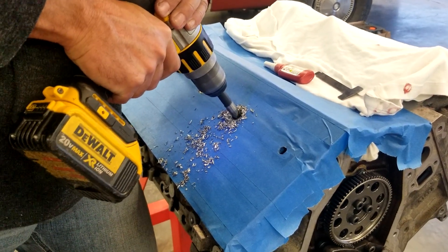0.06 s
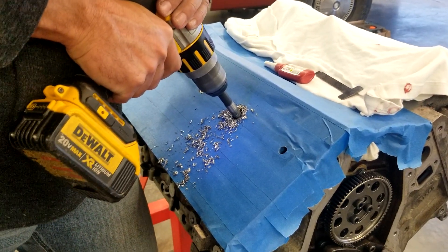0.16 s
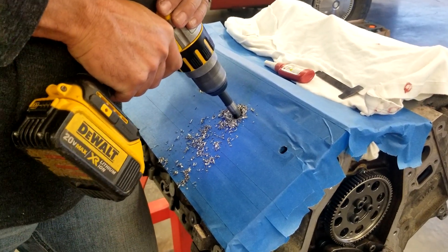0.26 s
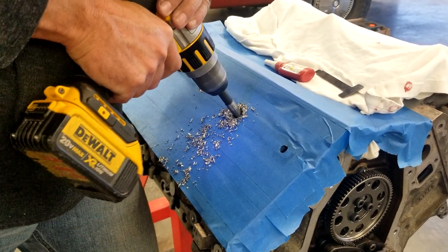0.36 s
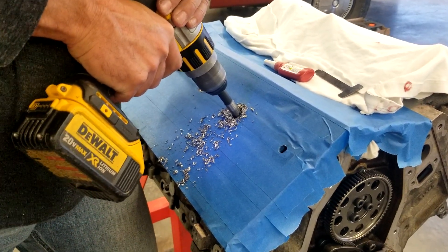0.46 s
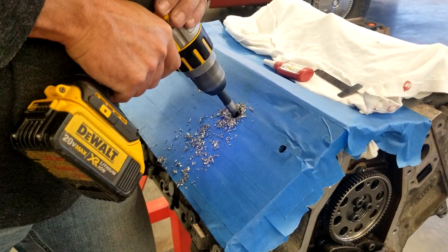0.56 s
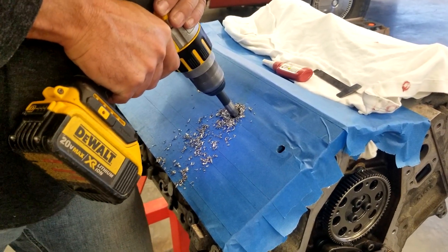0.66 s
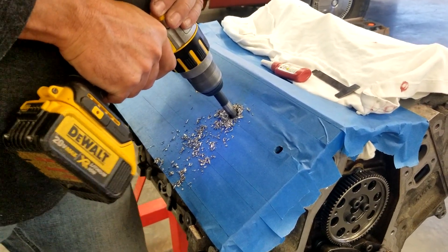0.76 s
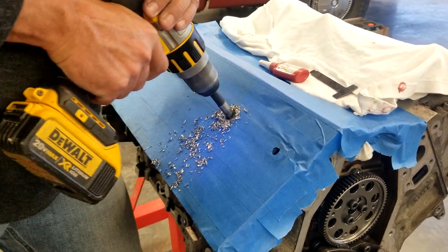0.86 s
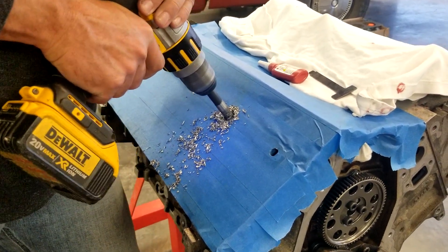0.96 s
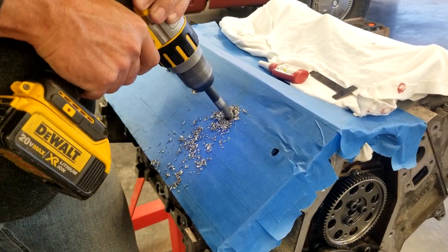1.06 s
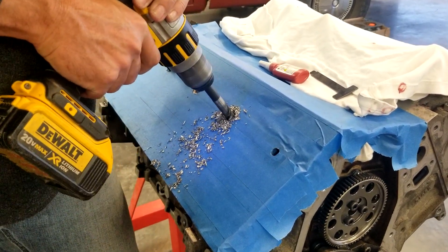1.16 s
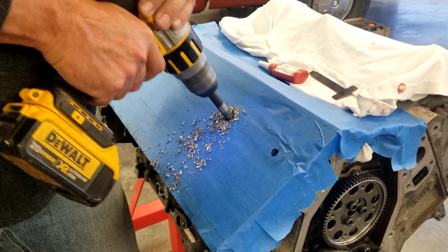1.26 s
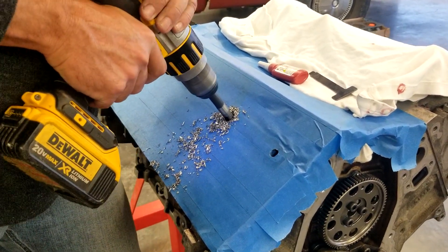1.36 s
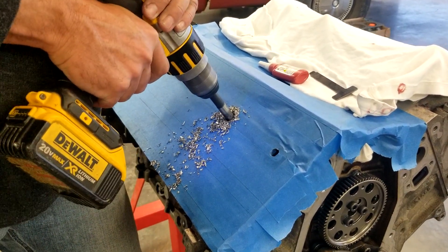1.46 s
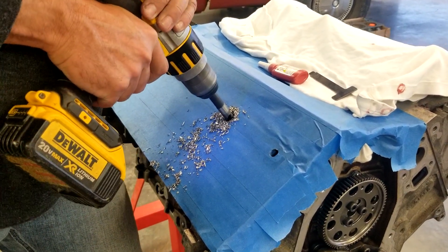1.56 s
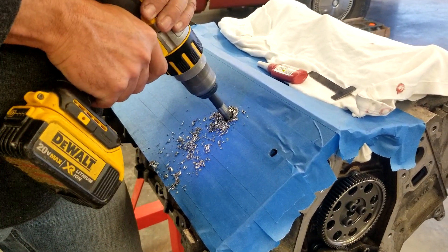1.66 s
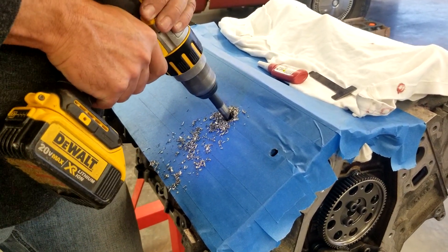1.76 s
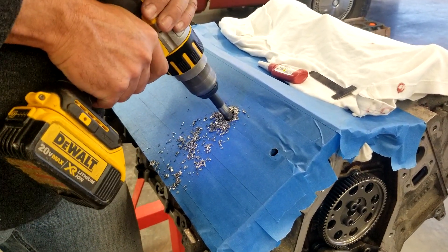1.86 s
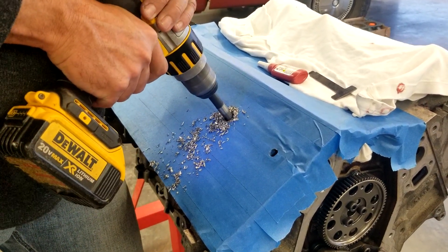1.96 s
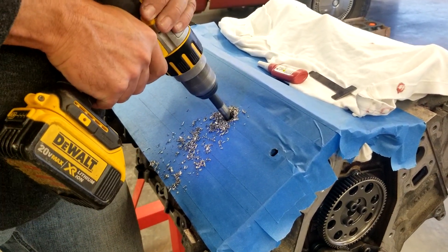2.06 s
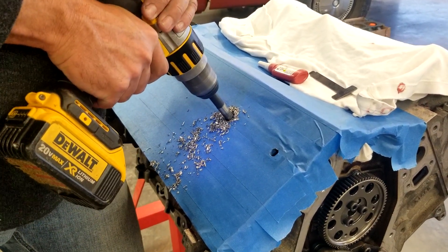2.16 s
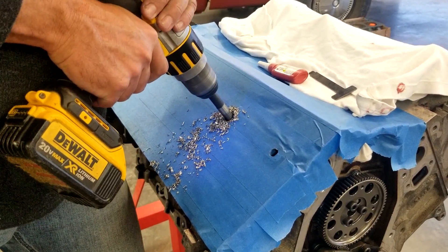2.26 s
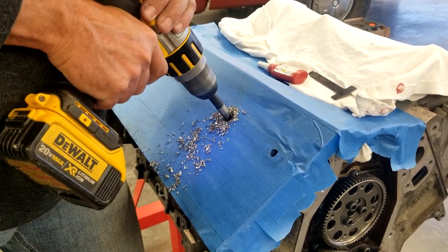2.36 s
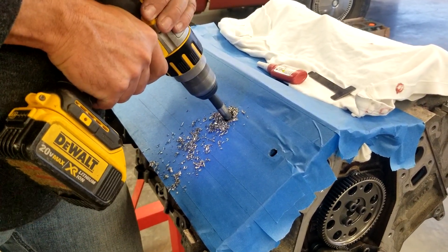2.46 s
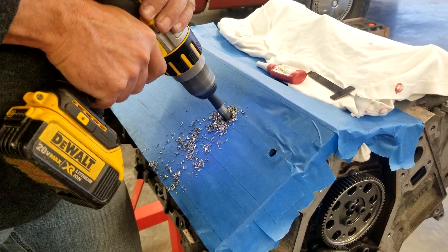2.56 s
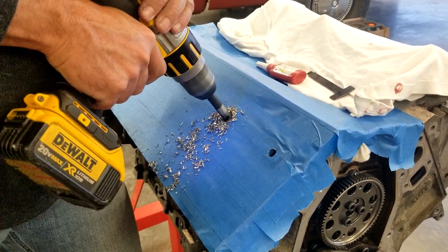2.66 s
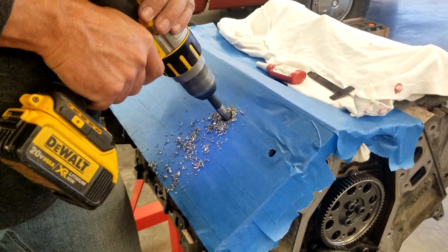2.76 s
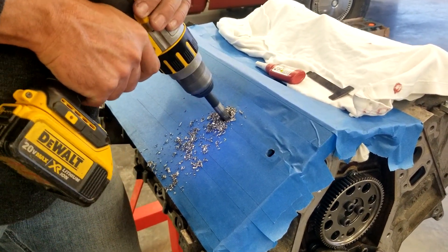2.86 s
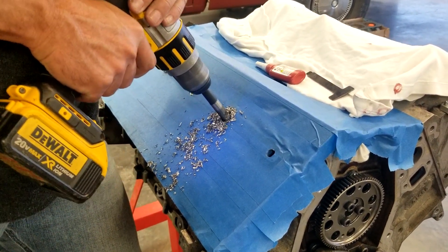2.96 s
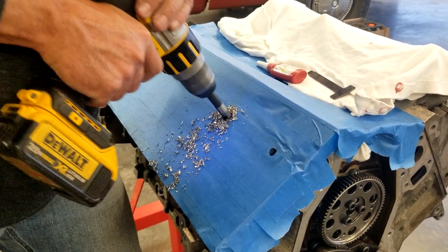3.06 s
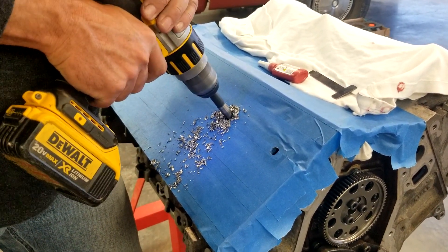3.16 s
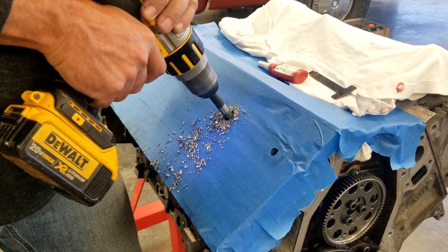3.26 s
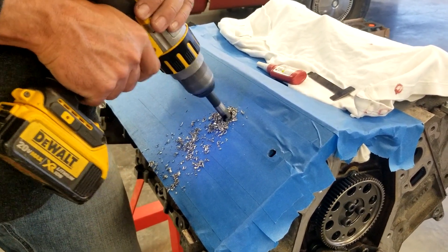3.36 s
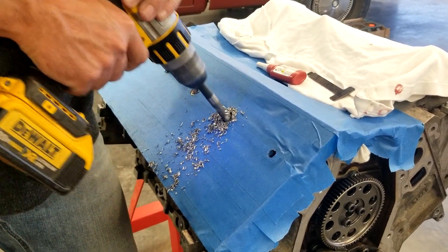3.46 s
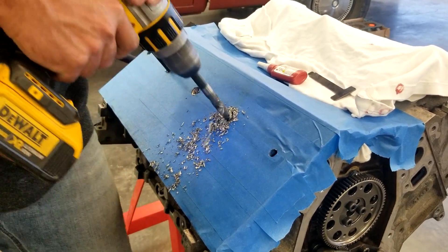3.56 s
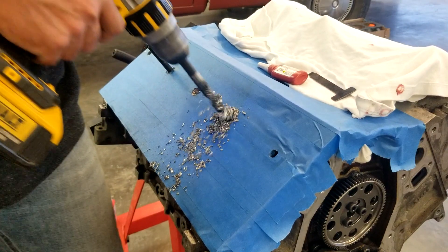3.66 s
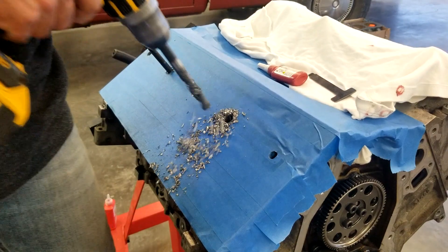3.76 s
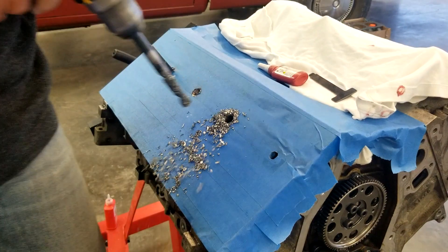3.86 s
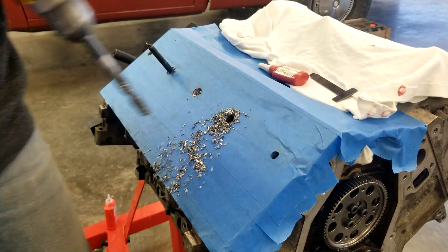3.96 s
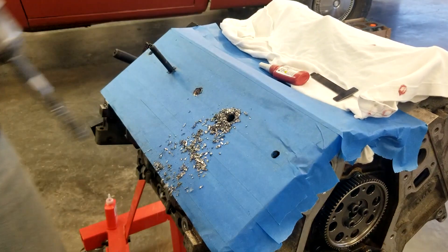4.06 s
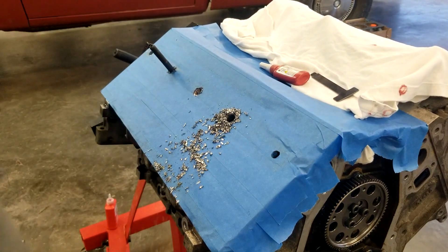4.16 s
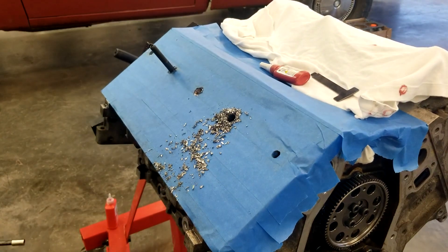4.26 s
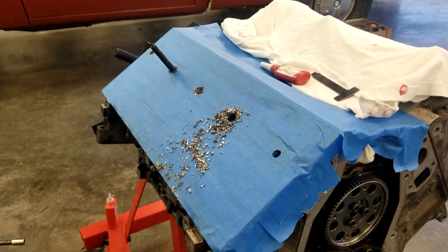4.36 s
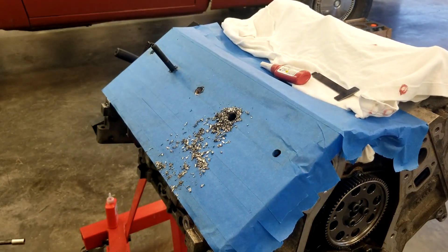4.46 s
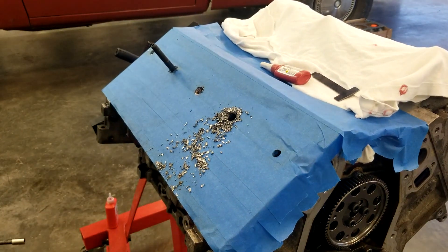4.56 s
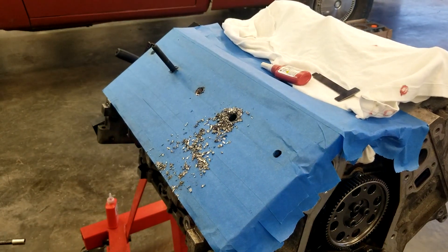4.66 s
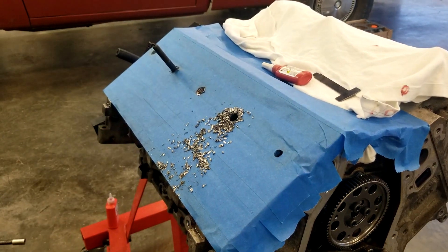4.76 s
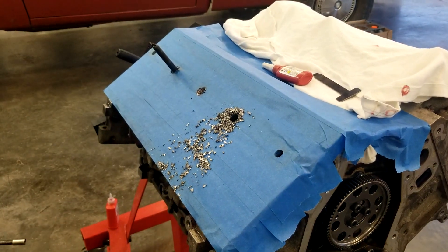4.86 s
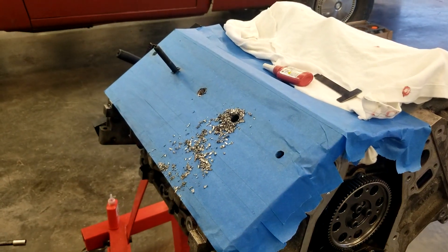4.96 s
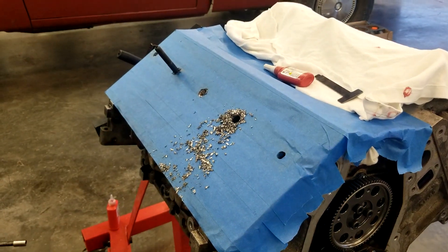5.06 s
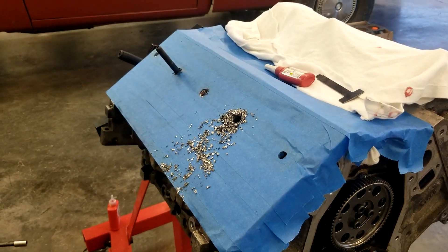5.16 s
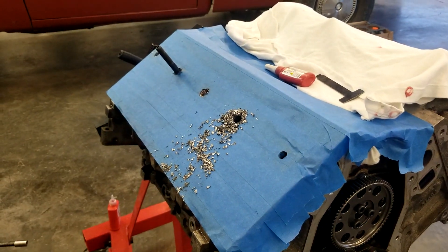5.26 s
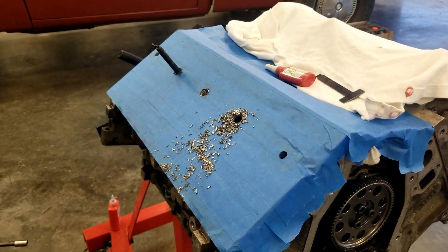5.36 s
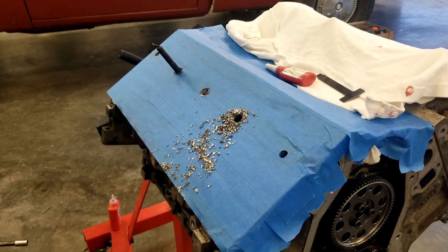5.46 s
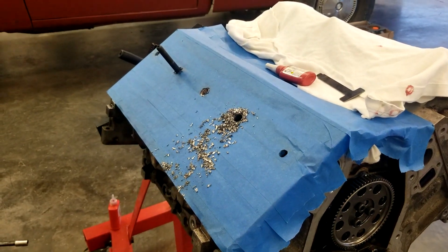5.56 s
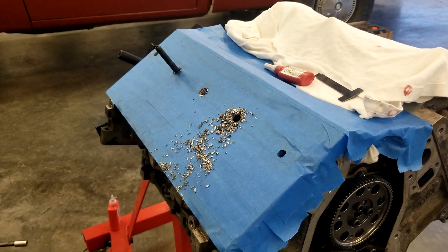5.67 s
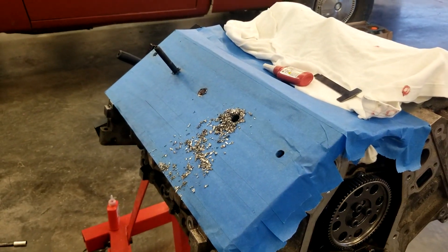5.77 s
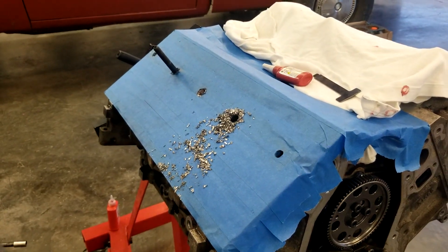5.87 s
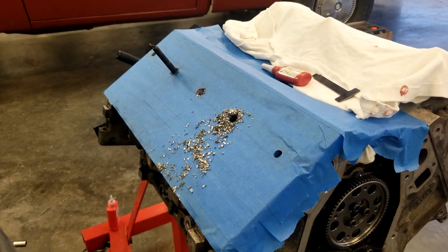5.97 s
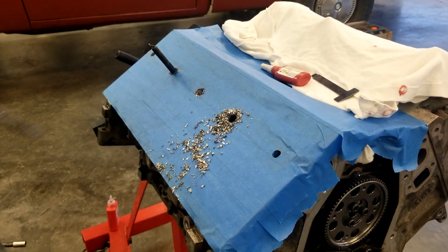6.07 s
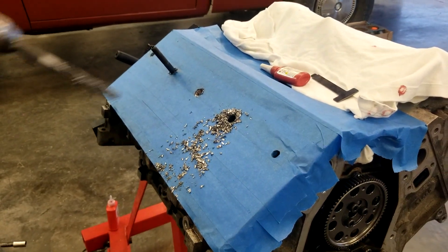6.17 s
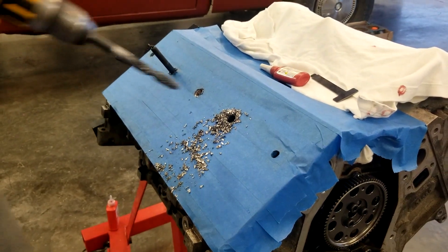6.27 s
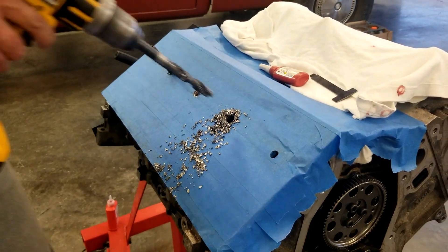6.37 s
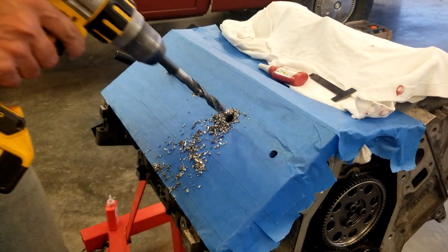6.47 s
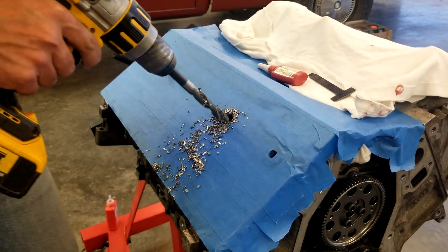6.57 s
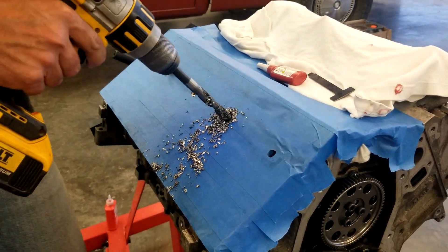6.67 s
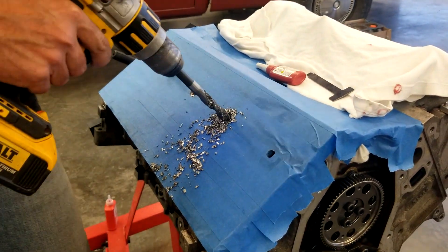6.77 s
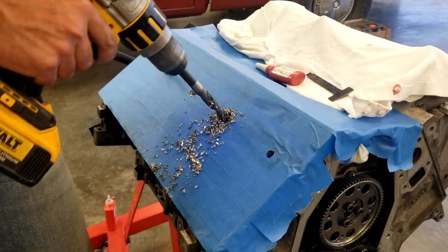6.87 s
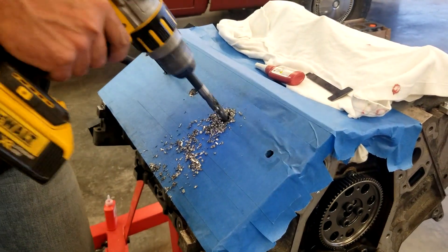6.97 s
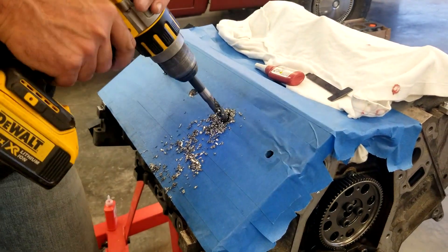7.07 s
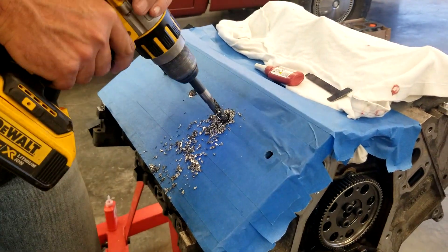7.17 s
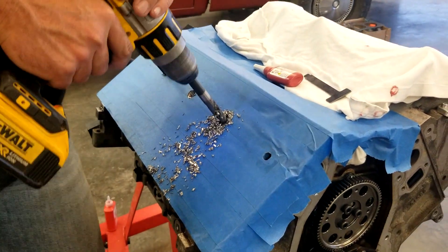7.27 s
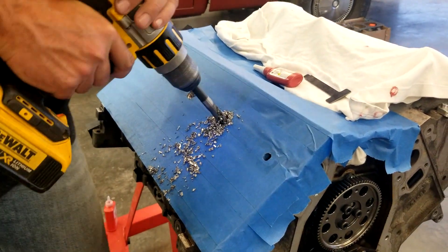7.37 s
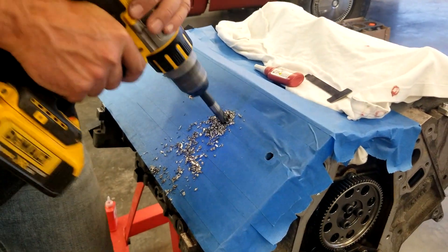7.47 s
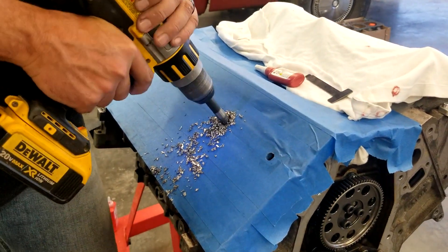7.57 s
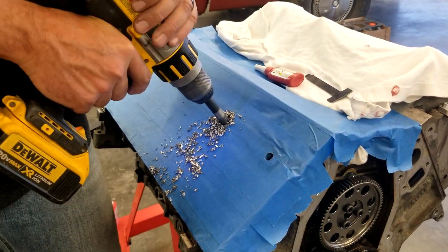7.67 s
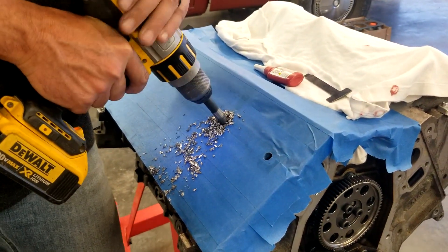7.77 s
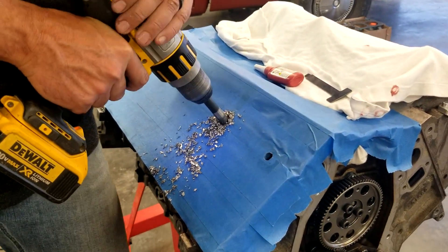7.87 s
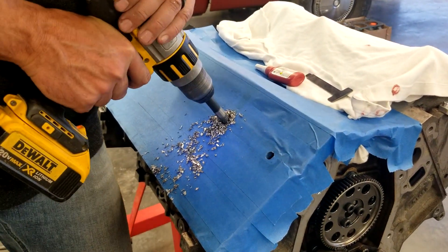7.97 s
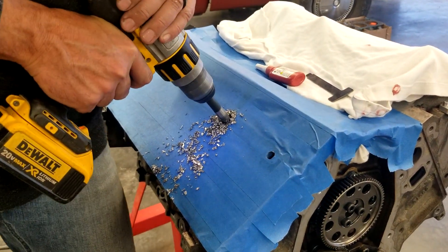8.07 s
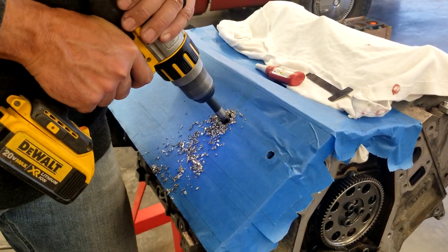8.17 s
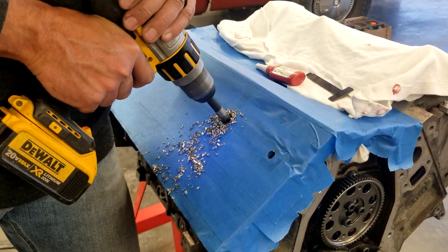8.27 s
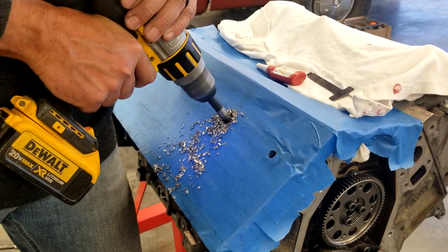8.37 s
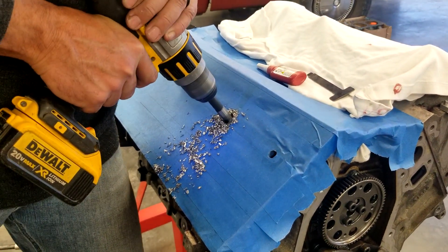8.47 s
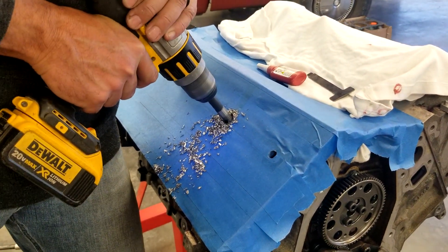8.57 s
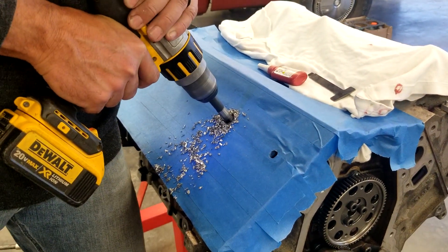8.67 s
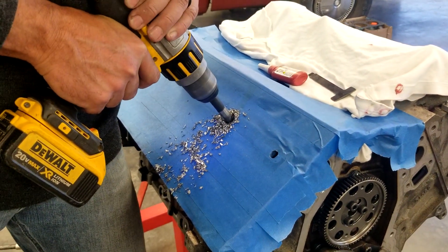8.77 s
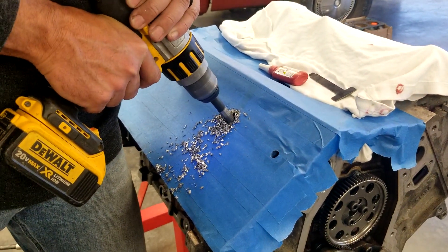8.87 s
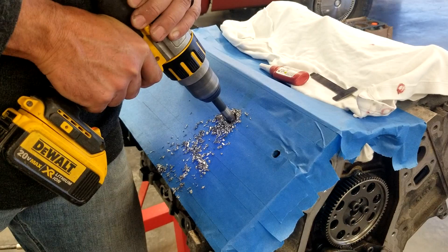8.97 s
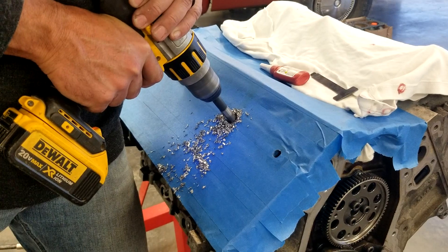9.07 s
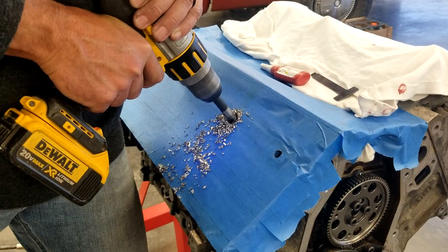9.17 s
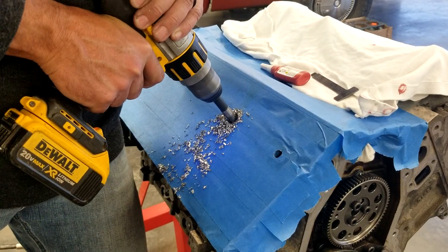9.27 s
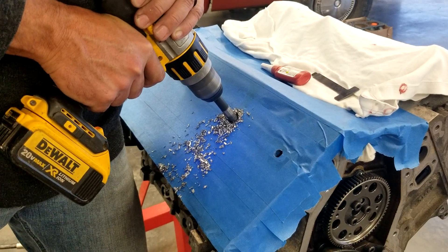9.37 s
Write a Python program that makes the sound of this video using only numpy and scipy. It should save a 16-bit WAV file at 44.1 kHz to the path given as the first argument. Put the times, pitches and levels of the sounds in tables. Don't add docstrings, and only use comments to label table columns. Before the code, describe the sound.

A cordless drill is already running close and slightly left of a small stereo microphone in a garage with a short reverberation. From 0 to 2.6 s it growls with gear whine and gritty cutting, its pitch dipping around 1.5 s and climbing again. From 2.7 s the bit rings higher and looser; sharp metallic jams snap at about 3.05, 3.2 and 3.5 s. At 3.9 s it brakes quickly with a cluster of clicks. Quiet low rumble remains, with chip ticks, a bright trickle, soft shoes near 4.6 and 6.1 s, and a cloth rub at 5.7 s. A hard knock lands at 6.5 s, then taps, pings and scraping around 6.9 and 7.3 s, heavy clunks at 7.5 s and another knock at 7.7 s. At 7.9 s the drill restarts, surging and squealing by 8.2 s, then grinds lower and steadily, with sharp high squeaks from 8.55 to 9.3 s.

```python
import sys
import numpy as np
from scipy import signal
from scipy.fft import rfft, irfft, next_fast_len
from scipy.io import wavfile
from scipy.ndimage import uniform_filter1d, map_coordinates

SR = 44100
rng = np.random.default_rng(int(sys.argv[2]) if len(sys.argv) > 2 else 0)


def amplitude_ratio(level_db):
    exponent = np.asarray(level_db, float) / 20
    return 10 ** exponent


def pcm_store(signal):
    levels = np.round(np.clip(np.atleast_2d(signal), -1, 1) * 32767)
    wavfile.write(sys.argv[1], SR, levels.astype(np.int16).T)


N = 415845
TIME = np.arange(N) / SR

# [f/Hz, likeness 0-1]
ALIKE = [(40, 0.62), (90, 0.92), (200, 1), (600, 0.94), (1500, 0.66), (3000, 0.2), (6000, 0.16),
         (10000, 0.15), (15000, 0.33)]
# [f/Hz, level/dB]
LEANING = [(60, 0), (150, 0), (380, -1.5), (950, 2), (2380, -1.5), (5980, 5.5), (15000, 5)]
# [f/Hz, level/dB]
PORT = [(7600, 3), (8900, -7.5), (10200, 1), (11500, 6), (14000, 0), (15400, -2.5)]
# [f/Hz, t60/s]
GARAGE = [(150, 0.6), (1000, 0.6), (4000, 0.29), (12000, 0.17)]
# [f/Hz, level/dB per Hz]
HUM = [(25, -34), (42, -10), (57, 4), (75, -5.5), (180, -18), (300, -27), (620, -31.5), (2050, -33.5),
       (7000, -40), (12000, -36.5), (16000, -38.5)]
# [t/s, width/s, level/dB]
SHIFTS = [
    (0, 1.9, 2.5),
    (3.701, 0.5, 6.5),
    (6.7, 0.77, 6.5),
]
LAG_S = -7 / 44100
TOP_HZ = 15800
HUM_DB = -73

# [t/s, shaft f/Hz, effort level/dB, bit running free 0-1, gear chatter over effort level/dB]
FIRST_PULL = [(0, 423, -30.5, 0.1, -4.5), (.73, 415.4, -31.5, 0.25, -4.5), (.78, 455, -37, 0.87, -9),
              (.83, 464.4, -35, 0.64, -14), (.9, 445, -35.5, 0.73, -11.5), (.97, 463.7, -37.5, .78, -18.5),
              (1.24, 470.7, -36.5, 0.66, -17.5), (1.28, 440.3, -34.5, 0.62, 0),
              (1.45, 334.5, -35.5, 0, -3.5), (1.6, 345.7, -36, 0, -4), (1.72, 405.3, -33.5, 0, -3.5),
              (1.78, 454.8, -31, 0.26, -8.5), (2.66, 478.7, -30.5, 0, -13), (2.7, 403.5, -33, 0.16, -12.5),
              (2.85, 356.4, -35, 0.54, -4.5), (3.05, 374.5, -39, .75, -9.5), (3.1, 392, -34, 0.14, -11),
              (3.17, 420, -37.5, 0.78, -12.5), (3.21, 401.5, -39, 0.94, -14),
              (3.285, 418, -40.5, 0.95, -16), (3.305, 406.4, -39.5, 0.93, -12), (3.46, 420, -43, 1, -12),
              (3.49, 402.5, -38.5, 1, -12.5), (3.55, 420, -41.5, 1, -12.5), (3.69, 422.4, -44, 0.98, -8.5),
              (3.9, 271, -49, 1, 4.5), (3.95, 240, -67, 0.75, -10)]
SECOND_PULL = [(7.89, 385.2, -57, .1, -26), (7.934, 392.8, -42.5, 0.019, -10.5),
               (8.14, 399.3, -36.5, 0.6, -8), (8.18, 425, -28.5, 0.26, -11), (8.27, 455, -25.5, 0.25, -8.5),
               (8.4, 440, -25.5, 0.0067, -8.5), (8.55, 415, -28, 0.061, -8.5),
               (8.7, 363.4, -30.5, 0.12, -22.5), (9.43, 382, -31.5, 0.18, -22.5)]
# [t/s, width/s, level/dB]
FEED = [
    (.81, 0.02, -2.5),
    (1.21, 0.035, -3.5),
    (1.31, 0.056, 0.5),
    (3.091, 0.069, 4),
    (8.3, 0.12, -2.5),
]
# [f/Hz, level/dB per Hz]
HOUSING = [(55, -64.5), (90, -28), (264, -22.5), (411, -13), (746, -12.5), (900, -11), (1270, 3),
           (1580, -5.5), (2000, -3.5), (2600, -33), (4400, -120)]
CUTTING = [(880, -45.5), (1500, -10.5), (1580, -18), (1950, -6.5), (2380, -4.5), (2950, -1), (3230, -6.5),
           (3960, -3), (4850, -6), (5400, -3.5), (7020, -26.5), (11900, -120)]
BIT = [(2760, -39), (4700, -11.5), (5230, -12.5), (6800, -3.5), (7410, -0.5), (7920, -3.5), (9420, -21.5),
       (10000, -15.5), (13000, -42), (22000, -120)]
FAN = [(5470, -37.5), (9300, -37), (9520, -26.5), (11100, 1), (12400, 1.5), (12800, 1.5), (13900, -1.5),
       (15200, 7.5), (15900, 4.5), (16300, -32)]
# [f/Hz, width/Hz, level over the noise/dB]
CHATTER = [(410, 44, -15), (748.6, 16, 6), (1665, 2, 0.5), (2300, 260, 1), (3945, 43, -22.5),
           (7300, 140, -10), (12500, 94, 5), (15190, 150, 7)]
CRUISE_HZ = 420
HOUSING_DB, HOUSING_FREE_DB, HOUSING_SHAKE = -2.5, 3, 0.28
REGRIP_DB = -4.5
BIT_DB, BIT_FREE_DB = -0.08, 1.5
FAN_DB, FAN_FREE_DB = -6, 5.5
START_S, FAN_LAG_DB, FAN_LAG_S = 7.9, -31, 0.022
THROUGH_S, THROUGH_BIT_DB, THROUGH_FAN_DB = 2.5, -0.5, 2.5
WHINE_DB, WHINE_DAMPED_DB = 2.5, 30.5
SECOND_DB, SECOND_DAMPED_DB = -20, 70
UNBALANCE_DB, UNBALANCE_FREE_DB, UNBALANCE_DB_PER_HZ, UNBALANCE_SHAKE = -62, 2, 0.1537, 0.26
CASE_HZ, CASE_WIDTH_HZ, CASE_DB = 416, 32, 8.5
GEARING, TURN_DB, TURN_SLIP = 18, 2, .6
WANDER_HZ = 40
STOP_S, STOP_FADE_S = 3.885, .012
BRAKE_S, BRAKE_LENGTH_S, FOURTH_DB = 3.8, .04, -42

# [t/s, f/Hz, level/dB]
PARTNER = [(1.25, 2300, -57), (1.4, 2300, -45), (1.7, 2420, -38), (1.8, 2254, -42.5), (2.05, 2346, -40.5),
           (2.6, 2392, -45), (2.7, 2400, -61)]
DEEP = [(1.76, 1500, -72), (1.84, 1680, -42), (2.0, 1670, -45.5), (2.4, 1660, -40), (2.55, 1776, -39),
        (2.67, 1810, -66.5)]
LOOSE = [(2.68, 7400, -58), (2.8, 7404, -35.5), (3.2, 7407, -36.5), (3.6, 7400, -42), (3.88, 7320, -61.5)]
SEIZE = [(3.175, 7280, -49.5), (3.185, 6940, -39), (3.197, 6070, -32), (3.225, 6030, -43.5),
         (3.235, 6100, -62)]
SQUEAL = [(8.14, 2330, -58), (8.175, 2450, -36), (8.21, 2800, -31), (8.3, 2850, -30.5), (8.4, 2658, -38),
          (8.5, 2446, -34.5), (8.58, 2334, -38.5), (8.68, 2380, -38), (8.75, 2300, -70)]
GROAN = [(8.2, 190, -75), (8.28, 190, -60), (8.47, 185, -57), (8.52, 185, -75)]
# [t/s, level/dB]
RUNOUT = [(3.15, -75), (3.19, -56), (3.5, -58), (3.7, -62), (3.82, -66), (3.88, -75)]
# [t/s, peak level/dB, f/Hz, length/s]
SQUEAKS = [
    (3.041, -44.5, 344, 0.019),
    (3.765, -39, 800, 0.0081),
    (7.231, -52, 1340, 0.0073),
    (7.245, -43, 1290, 0.0084),
    (8.5555, -21, 5840, 0.0084),
    (8.584, -26.5, 6770, 0.0044),
    (8.9349, -12.5, 6180, 0.0068),
    (9.051, -23.5, 5530, 0.01),
    (9.195, -22.5, 5810, 0.006),
    (9.317, -28, 6310, 0.012),
]

# [t/s, peak level/dB]
SNAGS = [
    (3.047, -16),
    (3.1742, -21.5),
    (3.4748, -24),
]
PAWL = [(3.8774, -29), (3.8848, -25.5), (3.895, -29), (3.9117, -31.5), (3.9147, -30), (3.9174, -29.5)]
RIMS = [
    (3.5556, -24.5),
    (6.87, -48.5),
    (6.9042, -36.5),
    (6.9236, -31.5),
    (7.2714, -39),
    (7.357, -43.5),
]
CLACKS = [
    (7.2796, -33.5),
]
THUDS = [(6.314, -59.5), (6.818, -43), (6.8282, -36.5), (6.9252, -31.5), (6.977, -34.5), (7.3968, -21),
         (7.455, -33.5), (7.4932, -17), (7.4963, -13.5)]
CATCHES = [(6.218, -44), (7.429, -21.5), (7.5026, -20), (7.507, -25), (7.886, -41.5), (7.913, -38.5),
           (7.9604, -21.5), (7.964, -13)]
PINGS = [
    (6.914, -28.5),
    (6.9569, -20),
    (7.292, -21.5),
]
# (low level/dB, ring level/dB, bright level/dB)
SNAG, RIM, CLACK, THUD, CATCH = (-19.5, -6, -5), (-3, 4.6, -16), (-17, -4, -20.5), (-12.5, -25.5, -6.5), (-19, -39, -7.5)
LATCH = (-14.5, -8, -2)
PING = (-7.5, 1.3, -30)
# [f/Hz, width/Hz, level/dB]
CLANG = [(420, 110, -5), (1311, 95, 18), (2300, 860, 0), (4275, 870, 1.5), (5530, 430, -4.5),
         (7500, 1200, -3), (11800, 6500, -18), (15500, 1100, -5)]
# [from f/Hz, to f/Hz]
BANDS = [(250, 600), (1100, 1500), (1600, 5000), (5000, 16800)]

# [t/s, peak level/dB, f/Hz]
TICKS = [(4.082, -61, 13740), (4.1143, -47, 11530), (4.3568, -35.5, 13020), (4.597, -58.5, 12500),
         (4.665, -60, 2400), (4.7206, -60.5, 10600), (4.799, -54, 12460), (4.872, -61, 6900),
         (4.9046, -57, 6700), (4.9279, -57.5, 7000), (4.9667, -55, 6840), (5.0782, -52.5, 12500),
         (5.2754, -59, 2350), (5.276, -59, 6500), (5.781, -53, 4780), (5.8802, -61, 6800),
         (5.921, -54, 6760), (5.972, -44.5, 7700), (5.992, -56, 7500), (6.172, -57.5, 2300),
         (6.637, -51, 7800), (6.685, -51, 5470), (6.872, -48.5, 2470), (7.179, -56, 2000),
         (7.2324, -51.5, 2020)]
# [f/Hz, level/dB, from t/s, to t/s, smear/Hz]
STAND = [(1880, -81, 4.32, 4.64, 0), (3860, -76, 4.09, 4.34, 8), (3860, -76, 4.33, 4.58, 0),
         (4730, -77, 4.1, 4.3, 0), (4730, -77, 4.33, 4.63, 0), (2300, -64, 6.205, 6.31, 110),
         (1400, -63, 6.33, 6.46, 70), (2200, -45, 6.525, 6.75, 160), (1350, -44, 6.95, 7.12, 70)]
# [t/s, peak level/dB, boxy level/dB, bright level/dB, t60/s]
STEPS = [
    (4.115, -52, -15, -35, 0.4),
    (4.645, -40.5, -3.5, -29, 0.45),
    (5.91, -57, 9.5, -6, 0.25),
    (5.952, -50.5, 0, -23, 0.25),
    (6.071, -33.5, 7, -14, 0.66),
    (7.287, -36, 3, -18, 0.33),
    (7.491, -26.5, 8, -4, 0.22),
]
# [peak t/s, rise/s, fall/s, level/dB, bright level/dB]
RUBS = [
    (4.27, 1.5, 0.65, -62.5, 8.5),
    (5.29, 0.027, 0.19, -66.5, -9.5),
    (5.6, 0.12, .2, -73, -14),
    (5.68, 0.17, 0.13, -58, -3),
    (5.91, 0.1, 0.9, -72.5, 8),
]
# [peak t/s, rise/s, fall/s, level/dB, bright level/dB]
DRAGS = [(6.2, 0.071, 1, -64.5, -10.5), (6.79, 0.53, 0.081, -61.5, -11), (6.828, 0.046, 0.039, -51.5, -10),
         (6.96, 0.13, 0.078, -32.5, -16), (7.02, .05, 0.4, -60, -10.5), (7.285, 0.048, 0.17, -36.5, -19),
         (7.399, 0.04, 0.3, -29, -14.5), (7.5, 0.046, 0.077, -24, -15.5), (7.6, .1, 0.36, -51.5, -11.5),
         (7.8, .5, 0.26, -61, -9)]
# [f/Hz, level/dB per Hz]
SLEEVE = [(700, -48.5), (1400, -24.5), (1900, -4.5), (2500, -3.5), (3100, -7.5), (5000, -9), (7150, -13.5),
          (12100, -120)]
DRAG_BODY = [(200, -20.5), (420, -8), (760, -15.5), (1330, -6.5), (1700, -9), (2330, -8.5), (3020, -12.5),
             (5500, -18.5), (7150, -16.5), (12100, -120)]
SWARF = [(2760, -16.5), (4700, -4.5), (5130, -8.5), (7790, -8), (9050, -14.5), (11500, -5), (15000, -2.5),
         (15800, -4), (16300, -11.5)]
STROKE_DB = 30

# [f/Hz, width/Hz, level/dB]
FACE = [(800, 600, -9), (1324, 400, -0.5), (2200, 440, 0.5), (3000, 530, -3), (4200, 680, -1.5),
        (5600, 690, -9.5), (6850, 1300, -14), (11520, 2000, -19), (15600, 1500, -16)]
# [t/s, peak level/dB, t60/s, tilt/dB per octave]
FACE_HITS = [
    (6.075, -50, .01, -3),
    (6.335, -25, .008, 2),
    (6.5316, -15, 0.03, -0.4),
    (6.5369, -20, 0.027, -2.8),
    (6.5807, -23.5, 0.019, -4.2),
    (7.4947, -10.5, .03, 3.5),
    (7.7303, -14, 0.014, 0.5),
    (7.7349, -28.5, 0.018, -3.7),
]
FACE_SNAP = 4.1
FACE_HUM, FACE_HUM_T60 = 0.11, 0.099


def unit(x):
    return x / np.sqrt(np.mean(x ** 2) + 1e-20)


def along(points, hz):
    f, v = np.transpose(points)
    return np.interp(np.log(hz + 1), np.log(f + 1), v)


def curves(rows, outside=-140):
    s, *cols = np.transpose(rows)
    return np.array([np.interp(TIME, s, c, left=outside, right=outside) for c in cols])


def wobble(rate):
    return map_coordinates(rng.standard_normal(int(N * rate / SR) + 4), [TIME * rate])


def bumps(rows):
    return sum(db * np.exp(-((TIME - s) / width) ** 2) for s, width, db in rows)


def filtered(x, response):
    m = next_fast_len(x.shape[-1] + 8192)
    return irfft(rfft(x, m) * response(np.fft.rfftfreq(m, 1 / SR)), m)[..., :x.shape[-1]]


def resonance(f, centre, width):
    return 1j * f * width / (centre * centre - f * f + 1j * f * width)


def rush(spectrum, grain_db, grain_rate, patchy_db=1.0):
    grains = rng.standard_normal((2, N)) * amplitude_ratio(grain_db * wobble(grain_rate))
    z = signal.stft(grains, nperseg=512)[2]
    field = uniform_filter1d(rng.standard_normal(z.shape[1:]), size=3, axis=0)
    field = uniform_filter1d(field, size=10, axis=1)
    pair = signal.istft(z * amplitude_ratio(patchy_db * unit(field)), nperseg=512)[1][:, :N]

    def mid_side(hz):
        turn = np.arccos(np.clip(along(ALIKE, hz), 0, 1)) / 2
        return amplitude_ratio(along(spectrum, hz)) * [np.cos(turn), np.sin(turn)]

    mid, side = filtered(pair, mid_side)
    return unit(np.array([mid + side, mid - side]))


def line(hz, db, smear_hz=0, apart=0.53):
    turn = 2 * np.pi * np.cumsum(np.maximum(hz, 0) * (1 + 0.00399 * wobble(40))) / SR
    if not smear_hz:
        return amplitude_ratio(db + 3.0 + wobble(30)) * np.sin(turn)
    shared = wobble(smear_hz) + 1j * wobble(smear_hz)
    own = np.array([wobble(smear_hz) + 1j * wobble(smear_hz) for side in "LR"])
    return amplitude_ratio(db) * unit(np.real((shared + apart * own) * np.exp(1j * turn)))


def placed(pair):
    half = lambda hz: amplitude_ratio(along(LEANING, hz) / 2) * np.exp(-1j * np.pi * hz * LAG_S)
    return filtered(pair, lambda hz: np.array([half(hz), 1 / half(hz)]))


def pans(db):
    return amplitude_ratio(np.array([[db / 2], [-db / 2]]))


def garage(x, wet_db):
    hz, t, z = signal.stft(rng.standard_normal((2, SR // 2)), SR, nperseg=256)
    tail = signal.istft(z * amplitude_ratio(-60 * t / along(GARAGE, hz)[:, None]), SR, nperseg=256)[1]
    late = np.pad(x, ((0, 0), (260, 0)))
    return amplitude_ratio(wet_db) * signal.fftconvolve(late, tail / np.linalg.norm(tail[0]), axes=1)[:, :x.shape[1]]


def echo(pair, wet_db):
    smooth = np.sqrt(np.abs(uniform_filter1d(np.abs(rfft(pair)) ** 2, size=350, axis=1)))
    click = np.roll(irfft(smooth, pair.shape[1]), 150, axis=1) * (np.arange(pair.shape[1]) < 300)
    return filtered(garage(click, wet_db), lambda f: f < TOP_HZ)


def floor_noise():
    return amplitude_ratio(HUM_DB + bumps(SHIFTS) + wobble(7.1)) * rush(HUM, 0.43, 12.0)


def drill():
    pull = np.maximum(curves(FIRST_PULL), curves(SECOND_PULL))
    first = gears(FIRST_PULL, centre_hz=1405, split_hz=105, smear_hz=129.9, pull=2.2, climb=16, case_db=CASE_DB)
    first = first * amplitude_ratio(-20 * np.maximum(TIME - STOP_S, 0) / STOP_FADE_S)
    second = gears(SECOND_PULL, centre_hz=1292, split_hz=48, smear_hz=110.3, pull=2.6, climb=3, case_db=-8)
    nearer_db = 1.4 * (TIME > 6)
    whole = cutting(*pull) + first + second + songs() + spindle(pull[0])
    return placed(whole * amplitude_ratio([nearer_db / 2, -nearer_db / 2]))


def gears(rows, centre_hz, smear_hz, pull, climb, case_db, split_hz):
    speed, effort_db, free, shake_db = curves(rows)
    faster = speed - CRUISE_HZ
    unbalance_db = UNBALANCE_DB + UNBALANCE_FREE_DB * free
    unbalance_db += UNBALANCE_DB_PER_HZ * faster + UNBALANCE_SHAKE * shake_db
    unbalance_db += case_db / (1 + (2 * (speed - CASE_HZ) / CASE_WIDTH_HZ) ** 2)
    clean_db = effort_db + WHINE_DB - WHINE_DAMPED_DB * (1 - free)
    second_db = effort_db + SECOND_DB - SECOND_DAMPED_DB * (1 - free)

    chuck_turn = 2 * np.pi * np.cumsum(np.maximum(speed, 0)) / (GEARING * SR)
    beat_db = TURN_DB * np.cos(chuck_turn + TURN_SLIP * wobble(8.2)) + 2.0 * wobble(70)
    centre = centre_hz + pull * faster + climb * shake_db
    chatter = 0
    for way in (-1, 1):
        strand_hz = centre + way * split_hz + WANDER_HZ * wobble(9)
        strand_db = effort_db + shake_db + beat_db - 5 + 3.5 * wobble(25)
        chatter = chatter + line(strand_hz, strand_db, smear_hz)

    unbalance = line(speed * (1 + .012 * wobble(50)), unbalance_db + 2.0 * wobble(60))
    return unbalance + line(2 * speed, second_db) + line(3 * speed, clean_db) + chatter


def cutting(speed, effort_db, free, shake_db):
    lag_db = FAN_LAG_DB * np.exp(-np.abs(TIME - START_S) / FAN_LAG_S)
    through = (TIME > THROUGH_S) & (TIME < 6)
    grip_db = np.where(TIME < 6, HOUSING_SHAKE * shake_db, REGRIP_DB)
    levels = effort_db + np.array([
        HOUSING_DB + HOUSING_FREE_DB * free + grip_db,
        0 * free,
        BIT_DB + BIT_FREE_DB * free + THROUGH_BIT_DB * through,
        FAN_DB + FAN_FREE_DB * free + lag_db + THROUGH_FAN_DB * through])
    levels += bumps(FEED) * np.array([[.8], [1], [.4], [.45]])
    load_db = 0.3 * wobble(21) + 0.82 * wobble(45)
    layers = [rush(HOUSING, 0.35, 150), rush(CUTTING, 0.99, 400), rush(BIT, 0.87, 500), rush(FAN, 1.1, 600)]
    noise = sum(amplitude_ratio(db + load_db) * layer for db, layer in zip(levels, layers))
    modes = lambda f: 1 + sum(amplitude_ratio(db) / (1 + (2 * (f - c) / w) ** 2) for c, w, db in CHATTER)
    return filtered(noise, modes)


def songs():
    first = line(*curves(PARTNER), smear_hz=120, apart=0.62) + line(*curves(DEEP), smear_hz=110)
    freed = line(*curves(LOOSE), smear_hz=347.0) + line(*curves(SEIZE))
    second = line(*curves(SQUEAL), smear_hz=130.8, apart=1.6) + line(*curves(GROAN), smear_hz=58.3)
    return first + freed + second


def squeaks():
    out, t = np.zeros(N + SR), np.arange(SR // 20) / SR
    for s, db, hz, length in SQUEAKS:
        swell = np.exp(-((t - length / 2) / (0.78 * length)) ** 2)
        chirp = np.sin(2 * np.pi * hz * t * (1.04 - 5 * t) + wobble(400)[:len(t)])
        out[round(s * SR):][:len(t)] += amplitude_ratio(db) * swell * chirp
    return placed(np.array([out[:N]] * 2))


def contacts():
    kinds = [(SNAG, SNAGS), (LATCH, PAWL), (RIM, RIMS), (CLACK, CLACKS), (THUD, THUDS), (CATCH, CATCHES),
             (PING, PINGS)]
    return [(*blow, *colour) for colour, blows in kinds for blow in blows]


def knocks():
    out, t = np.zeros((2, N + SR)), np.arange(SR // 2) / SR

    def metal(f, lo, hi):
        body = 0.11
        for k, (c, w, db) in enumerate(CLANG):
            outside_db = 13 * (k == 1 and not lo < c < hi)
            body = body + (-1) ** k * amplitude_ratio(db - outside_db) * resonance(f, c, w)
        return body

    def band(f, lo, hi):
        return metal(f, lo, hi) * (1j * f / lo / (1 + 1j * f / lo) / (1 + 1j * f / hi)) ** 2

    shape = (amplitude_ratio(-60 * t / .010) + .11 * amplitude_ratio(-60 * t / .07)) * (1 - np.exp(-t / .0003))
    for s, db, low_db, ring_db, bright_db in contacts():
        noise = rng.standard_normal((len(BANDS), len(t))) * shape
        parts = filtered(noise, lambda f: np.array([band(f, lo, hi) for lo, hi in BANDS]))
        parts = parts / np.sqrt(np.sum(parts ** 2, axis=1, keepdims=True) / 12)
        pair = amplitude_ratio(db + np.array([low_db, ring_db, 0, bright_db + 10.5])) @ parts * pans(7.6)
        pair[1] = np.roll(pair[1], 6)
        out[:, round(s * SR):][:, :len(t)] += pair + echo(pair, wet_db=-13.5)
    return out[:, :N]


def spindle(speed):
    brake = line(4 * speed, FOURTH_DB - 9 * ((TIME - BRAKE_S) / BRAKE_LENGTH_S) ** 2, smear_hz=39.8)
    mesh = line(2300 + 0 * TIME, -43 - 9 * ((TIME - 3.5) / .25) ** 4)
    return line(speed, *curves(RUNOUT)) + mesh + brake


def ticks():
    out, t = np.zeros(N + SR), np.arange(SR // 40) / SR
    for s, db, hz in TICKS:
        burst = rng.standard_normal(len(t)) * amplitude_ratio(-60 * t / 0.007)
        snap = filtered(burst, lambda f: resonance(f, hz, hz * 0.17))
        out[round(s * SR):][:len(t)] += amplitude_ratio(db) * snap / np.abs(snap).max()
    pair = out[:N] * pans(2)
    for hz, db, start, end, smear_hz in STAND:
        ring = curves([(start, hz, db - 10), (start + .02, hz, db + 1), (end, hz, db - 11)])
        pair += line(*ring, smear_hz) * amplitude_ratio(2 * wobble(40))
    return pair + garage(pair, wet_db=-5.5)


def steps():
    out, t = np.zeros(N + SR), np.arange(SR // 2) / SR
    for s, db, boxy_db, bright_db, t60 in STEPS:
        puff = rng.standard_normal(len(t)) * amplitude_ratio(-60 * t / np.clip(t60, .22, .35)) * (1 - np.exp(-t / .002))
        colour = [(50, -14.0), (110, 5.5), (200, 4.0), (500, boxy_db), (1000, bright_db),
                  (2500, bright_db - 26.0), (5000, -90)]
        puff = filtered(puff, lambda f: amplitude_ratio(along(colour, f)))
        out[round(s * SR):][:len(t)] += amplitude_ratio(db) * puff / np.abs(puff).max()
    pair = np.array([out[:N]] * 2)
    return pair + garage(pair, wet_db=-14)


def strokes(rows):
    s, rise, fall, db, bright_db = np.transpose(rows)[..., None]
    low_db = db - STROKE_DB * np.maximum((s - TIME) / rise, (TIME - s) / fall)
    return low_db.max(axis=0), (low_db + bright_db).max(axis=0)


def rustle():
    cloth_db, swarf_db = strokes(RUBS)
    low_db, bright_db = strokes(DRAGS)
    drag = amplitude_ratio(low_db) * rush(DRAG_BODY, 3.9, 120) + amplitude_ratio(bright_db) * rush(SWARF, 2.1, 130)
    soft = amplitude_ratio(cloth_db) * rush(SLEEVE, 1.8, 140) + amplitude_ratio(swarf_db) * rush(SWARF, 3.2, 110)
    return soft + placed(drag) + garage(drag, wet_db=-15.0)


def face():
    out, t = np.zeros((2, N + SR)), np.arange(SR // 2) / SR
    for s, db, t60, tilt_db in FACE_HITS:
        def body(f):
            tilt = amplitude_ratio(tilt_db * np.log2(np.clip(f, 500, 6000) / 2500))
            return tilt * sum((-1) ** k * amplitude_ratio(mode_db) * resonance(f, c, w)
                              for k, (c, w, mode_db) in enumerate(FACE))

        decay = amplitude_ratio(-60 * t / t60) + FACE_HUM * amplitude_ratio(-60 * t / FACE_HUM_T60)
        blow = filtered(FACE_SNAP * (t == 0) + rng.standard_normal(len(t)) * decay, body)
        pair = amplitude_ratio(db) * blow / np.abs(blow).max() * pans(2)
        pair[1] = np.roll(pair[1], 6)
        out[:, round(s * SR):][:, :len(t)] += pair + echo(pair, wet_db=-11.5)
    return out[:, :N]


def scene():
    motor = drill() + squeaks()
    port = lambda hz: amplitude_ratio(along(PORT, hz))
    near = filtered(ticks() + floor_noise(), port)
    steady = motor + garage(motor, wet_db=-14.0) + steps() + rustle() + near
    blows = filtered(knocks() + face(), lambda hz: port(hz) * (hz < 16800))
    return filtered(steady, lambda hz: hz < TOP_HZ) + blows


def band_limit(x):
    return signal.sosfilt(signal.butter(12, 17130, fs=SR, output="sos"), x)


def record(dry):
    return band_limit(dry)


dry = scene()
out = record(dry)
pcm_store(out)
```